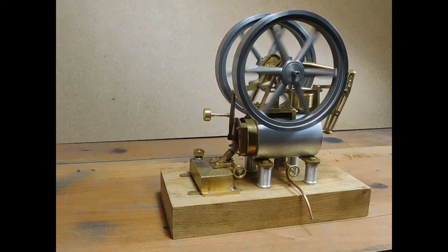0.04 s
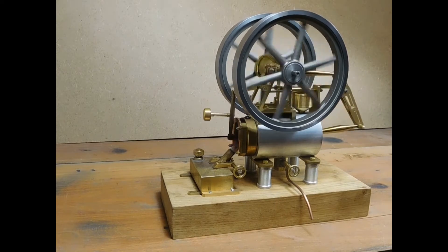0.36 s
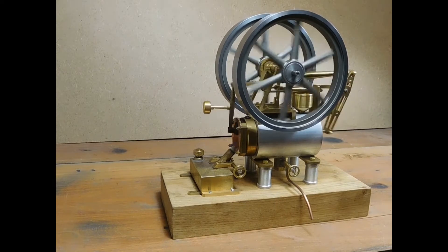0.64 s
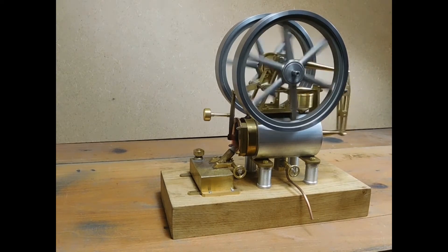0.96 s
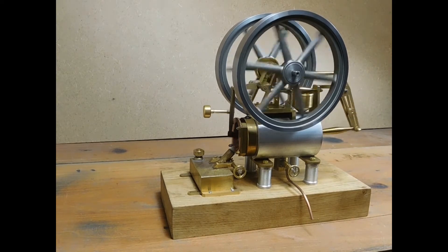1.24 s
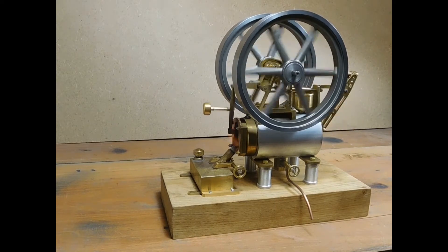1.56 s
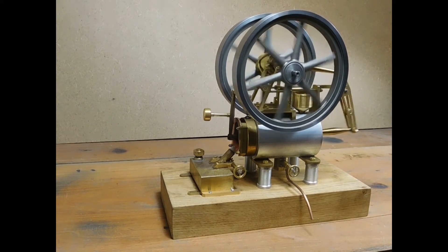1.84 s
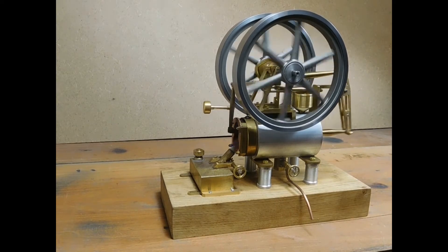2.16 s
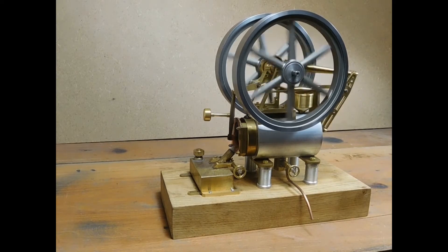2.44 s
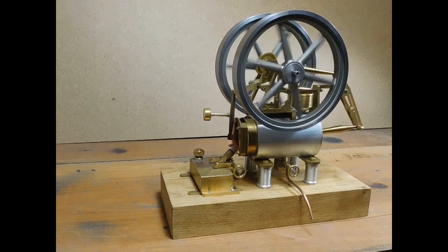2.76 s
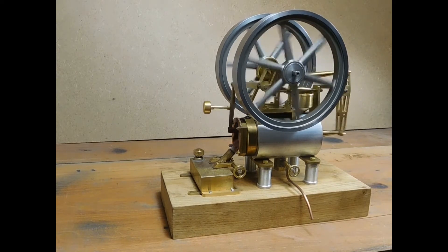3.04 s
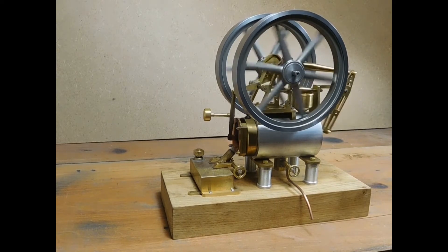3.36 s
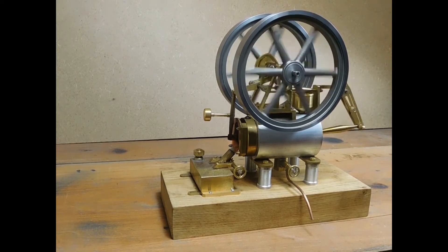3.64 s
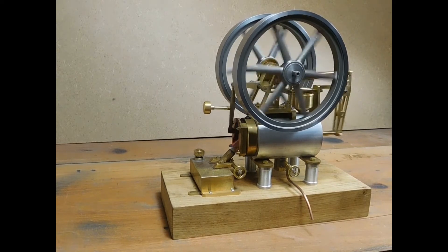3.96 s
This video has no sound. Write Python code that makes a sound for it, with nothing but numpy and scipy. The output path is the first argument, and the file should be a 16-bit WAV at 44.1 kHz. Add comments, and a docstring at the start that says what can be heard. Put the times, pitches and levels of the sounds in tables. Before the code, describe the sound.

A model engine turns over evenly in a small room with a short echo. About twice a second its valve snaps shut, gas hisses, the linkage knocks and a brass part clinks, while the bearings rattle softly over a light hiss.

```python
"""In a small room, on a wooden table, a model flame-licker engine turns over about twice a second.
Each cycle the valve clacks shut and thumps the base, gas hisses and chirps through the gap,
the linkage knocks twice and a brass part clinks. Bearings rub softly over a steady hiss.
The hits are made of short bursts of noise and fading tones; the room adds a short echo."""
import sys
import numpy as np
from scipy import signal
from scipy.fft import rfft, irfft
from scipy.io import wavfile
from scipy.ndimage import uniform_filter1d

SR = 44100
rng = np.random.default_rng(int(sys.argv[2]) if len(sys.argv) > 2 else 0)


def int16_out(signal):
    """Quantize to a 16-bit WAV file."""
    q = np.round(np.clip(np.atleast_2d(signal).T, -1, 1) * 32767)
    wavfile.write(sys.argv[1], SR, q.astype(np.int16))


N = 176400
T = np.arange(SR // 2) / SR  # time within one short sound [s]

# Levels in the tables are relative. A fade time (t60) is how long a sound takes to drop by 60 dB.
# each closing of the valve (time [s], level [dB], valve ring [dB], hollow ring [dB], gas rush [dB])
STROKES = [(.0075, 0, -1.5, -1, 0.5), (0.4898, -0.5, 1, -5, 3), (.9630, 0, -3, -11.5, 2),
           (1.4378, 1.5, 2.5, -0.5, 1.5), (1.9096, 1, 1, -2, 1.5), (2.3820, 1.5, 0.5, -3, 0.5),
           (2.8480, 2, 0, -2.5, 1), (3.3060, 1, -2.5, 3.5, 1.5), (3.765, 1.5, 1, 2.5, 0.5)]


def valve_clacks():
    """The valve slaps shut with a spit of gas, a softer echo follows 8 ms later, and the wooden base and table
    shake."""
    # ringing of the table, hollow base, valve plate and its first crack (pitch [Hz], level [dB], fade [s])
    table_modes = [(138, -9, 0.1), (180.4, -6.5, .12), (229.5, -11.5, 0.18), (280.5, -8, 0.099),
                   (391.6, -10.5, 0.083), (500, -6, 0.052)]
    hollow_modes = [(613, -8.5, 0.057), (662, 2, 0.07), (748, -4, 0.076), (805, -11.5, 0.095),
                    (882, -6, 0.06)]
    plate_modes = [(1467, 1.5, 0.026), (1580, -14.5, 0.03), (1640, -11.5, 0.097), (1673, -1, 0.044),
                   (1796, -4.5, 0.038)]
    crack_modes = [(1554, -12.5, 0.026), (780, -7.5, 0.015)]
    # tone colours of the dull thud and the bright spit (frequency [Hz], level [dB])
    thud_colour = [(30, -41), (90, -14), (150, -10.5), (300, -9), (480, -3), (750, 2.5), (1100, -8.5),
                   (1700, -4), (2000, -13), (4000, -15), (16000, -26)]
    spit_colour = [(100, -69), (3000, -10), (7500, -2), (9600, 4.5), (10300, 2), (11200, 5.5), (13000, 4.5),
                   (14300, -9), (16000, -6)]
    fresh = 0.96  # each hit is mostly new noise, plus a little that all hits share
    reused = np.sqrt(1 - fresh ** 2)
    shared_spit, shared_thud = noise(spit_colour), noise(thud_colour)
    out = np.zeros((2, N))
    for s, db, valve_db, hollow_db, _ in STROKES:
        table = ring(table_modes, scatter_db=0.04, detune=0.0013, spread=0.13)
        hollow = amp(hollow_db) * ring(hollow_modes, scatter_db=3, detune=0.0096, spread=0.11)
        add(out, s + 0.00253, amp(db - 42) * pan(-1.5) * (table + hollow))
        plate = ring(plate_modes, scatter_db=1.6, detune=0.009, spread=0.37)
        add(out, s + 0.00152, amp(db + valve_db - 39.5) * pan(-2.5) * plate)
        for lag, drop_db in ((0, 0), (0.008, -8)):  # the hit, then a softer echo of it 8 ms later
            spit = (reused * shared_spit + fresh * noise(spit_colour)) * envelope(0.0018, 0.00082, 0.013)
            thud = (reused * shared_thud + fresh * noise(thud_colour)) * envelope(0.0031, 0.0019, 0.041)
            add(out, s + lag, amp(db + drop_db - 40) * pan(0.5) * thud)
            add(out, s + lag + 0.003, amp(drop_db - 37.5) * pan(5.5) * spit)
        crack = ring(crack_modes, scatter_db=3.8, detune=0.014, spread=0.71)
        add(out, s + 0.00152, amp(db + valve_db - 36.5) * crack)
    return out


def gas_rush():
    """Gas hisses through the gap after each clack, with a flutter of faint chirps and a few loud ones."""
    # tone colour of the rushing gas (frequency [Hz], level [dB])
    gas_colour = [(60, -21), (200, -2), (600, 1.5), (1500, 4.5), (3500, 2.5), (6000, -2.5), (9000, 1.5),
                  (12000, -2.5), (14000, -8), (16000, -12)]
    # the louder chirps (time [s], level [dB], final pitch [Hz], fade [s])
    loud_chirps = [(.0590, -34.5, 11000, 0.016), (.094, -49, 7900, 0.046), (.5382, -37.5, 11500, 0.023),
                   (0.567, -49, 10500, .03), (0.569, -46, 7840, .03), (1.014, -41.5, 8080, .06),
                   (1.033, -50, 7600, .05), (1.471, -48, 12250, 0.045), (1.487, -54, 12700, 0.036),
                   (1.958, -50, 11300, 0.036), (1.973, -55, 10000, 0.037), (2.4288, -36, 11000, 0.024),
                   (2.4626, -45.5, 7700, 0.03), (2.882, -45, 12500, 0.037), (2.893, -51, 12800, .03),
                   (2.92, -46, 10000, 0.016), (3.326, -42, 10160, 0.082), (3.351, -41, 11300, 0.024),
                   (3.801, -47, 10000, 0.034), (3.837, -48, 9600, .03)]
    fall_hz_per_s = 30000
    swell = envelope(0.012, 0.047, 0.27) * amp(-70 * T)
    out = np.zeros((2, N))
    for s, *_, db in STROKES:
        rough_db = 2.5 * wobble(len(T), smooth_samples=70)
        add(out, s, amp(db - 46 + rough_db) * pan(-0.4) * noise(gas_colour) * swell)
        for lag in np.linspace(0.02, 0.072, 6):  # later chirps in the flutter tend to be lower
            stray_hz, stray_s, stray_db = rng.standard_normal(3) * (715, 0.0017, 2.5)
            hz = 11700 - fall_hz_per_s * (lag - 0.052) + stray_hz
            add(out, s + lag + stray_s, amp(-52 + stray_db) * chirp(hz, t60=0.03, sweep=0.047))
    for s, db, hz, t60 in loud_chirps:
        add(out, s, amp(db) * chirp(hz, t60, sweep=0.29))
    return out


def chirp(hz, t60, sweep):
    """A breathy whistle of gas starts too low by the fraction sweep, slides up to hz and fades."""
    glide_s, breath = 0.00155, 0.42
    pitch = hz * (1 - sweep * np.exp(-T / glide_s))
    ear_phase = np.array([[1.33], [0]])
    tone = unit(np.sin(2 * np.pi * np.cumsum(pitch) / SR + ear_phase))
    whistle = unit((1 - breath) * tone + breath * narrow_noise(pitch, width_hz=1500))
    return pan(9.5) * whistle * envelope(0.0011, 0.00069, t60)


def linkage_knocks():
    """The loose linkage gives dull knocks, and each one sets a steel rod ringing."""
    # knocks (time [s], level [dB], rod ring [dB])
    knocks = [(.115, -5, -11), (0.1228, -1.5, -3), (0.595, -4, -8), (0.6022, -7.5, 6.5), (1.068, -5, -12),
              (1.0765, -3.5, 0), (1.542, -4, -15), (1.5491, -4, 2), (2.013, -4, -12), (2.023, -5.5, 0.5),
              (2.485, -5, -4), (2.4917, -3.5, 0.5), (2.949, -3, -12), (2.9563, -1.5, 2.5), (3.409, 1, -3.5),
              (3.4168, -5, 4), (3.8645, -0.5, -12), (3.874, -1, -4), (3.903, -2.5, -4), (2.988, -7.5, -10),
              (3.445, -7, -8)]
    # tone colour of a knock (frequency [Hz], level [dB])
    knock_colour = [(60, -13), (300, -8), (600, 2), (1000, -11), (1500, 4), (2200, -4.5), (3300, -2),
                    (4800, -6.5), (7000, -8), (10500, -8.5), (16000, -21)]
    # ringing of the rod (pitch [Hz], level [dB], fade [s])
    rod_modes = [(2950, 1.5, 0.01), (3440, -3.5, 0.053), (4040, -2.5, 0.04), (4720, 0, 0.027),
                 (5820, 1, .02)]
    out = np.zeros((2, N))
    for s, db, rod_db in knocks:
        add(out, s, amp(db - 43) * noise(knock_colour) * envelope(0.00089, 0.0017, 0.042))
        rod = ring(rod_modes, scatter_db=2.5, detune=0.019, spread=0.78)
        add(out, s + 0.000922, amp(db + rod_db - 44) * rod)
    return out


def brass_clinks():
    """A brass part is struck once a cycle and rings brightly."""
    # clinks (time [s], level [dB])
    clinks = [(0.1617, -6), (0.6421, -3), (1.1166, -5.5), (1.5917, -1.5), (2.0627, -5.5), (2.534, -3),
              (2.9962, -1.5), (3.4568, -4), (3.9117, -1.5)]
    # tone colour of the strike (frequency [Hz], level [dB])
    strike_colour = [(60, -23), (300, -12), (620, 6), (850, -7.5), (1400, 1.5), (2000, -2.5), (2600, 7.5),
                     (4000, -9), (6500, -7.5), (8500, -4.5), (12000, -11), (16000, -14)]
    # ringing of the brass (pitch [Hz], level [dB], fade [s])
    brass_modes = [(2572, 6.5, 0.074), (2630, -10, .06), (3375, 1, 0.032), (3600, -5.5, 0.07),
                   (3900, -7.5, 0.1), (4120, -5.5, 0.085), (5380, -22, .9), (5360, 4, 0.028),
                   (7200, -36, .1), (8220, 3, 0.023), (9432, -7, 0.07)]
    out = np.zeros((2, N))
    for s, db in clinks:
        strike = amp(-39) * noise(strike_colour) * envelope(0.00071, 0.001, 0.086)
        brass = amp(-42.5) * ring(brass_modes, scatter_db=0, detune=0.0026, spread=0.79)
        add(out, s, amp(db) * (strike + brass))
    return out


def stray_ticks():
    """The loose rods give a few tiny ticks, each a burst of noise strongest at one pitch."""
    # ticks (time [s], level [dB], pitch [Hz], treble slope [dB/octave], fade [s], left over right [dB])
    ticks = [(0.4121, -42.5, 1510, -5, 0.038, 2), (2.6258, -37, 3000, -4, 0.011, 2),
             (3.0395, -48, 2740, -31, 0.016, -12), (3.4778, -39, 2270, -12.5, 0.011, -9)]
    out = np.zeros((2, N))
    for s, db, hz, slope_db, t60, pan_db in ticks:
        colour = [(hz / 32, -70), (hz, 0), (hz * 8, 3 * slope_db)]  # five octaves down, three up
        add(out, s, amp(db) * pan(pan_db) * noise(colour) * envelope(0.0003, 0.00029, t60))
    return out


def bearing_rattles():
    """The bearings rattle softly between the clacks."""
    # rattles (time [s], level [dB])
    rattles = [(0.3, -45), (0.329, -46), (0.37, -44.5), (0.791, -58), (0.86, -41.5), (0.889, -47),
               (1.329, -43), (1.359, -43.5), (1.383, -41), (1.723, -41.5), (1.75, -44.5), (1.789, -44),
               (2.26, -53), (2.301, -41.5), (2.748, -42.5), (3.125, -43.5), (3.639, -45.5), (3.684, -44.5)]
    # tone colour of a rattle (frequency [Hz], level [dB])
    rattle_colour = [(60, -62), (500, -1), (1300, 6.5), (2300, -0.5), (4000, 0), (6000, -9.5), (8000, 0.5),
                     (16000, -17)]
    out = np.zeros((2, N))
    for s, db in rattles:
        add(out, s, amp(db - 8.5) * noise(rattle_colour) * envelope(0.00068, 0.00067, 0.066))
    return out


def sliding_rubs():
    """Now and then a sliding part rubs briefly."""
    # rubs (time [s], level [dB], pitch [Hz])
    rubs = [(.306, -57.5, 1253), (1.352, -54, 1980), (1.379, -58.5, 1495)]
    out = np.zeros((2, N))
    for s, db, hz in rubs:
        add(out, s, amp(db) * narrow_noise(hz, width_hz=330) * envelope(0.008, 0.017, 0.058))
    return out


def room_echo(sound):
    """The room sends back scattered reflections; each range of pitch fades at its own speed."""
    # echo bands (frequency [Hz], fade [s], level [dB])
    bands = [(129, 1, -9), (392, 0.21, -2.5), (1200, 0.53, -5), (3500, 0.13, -5.5), (10000, 0.45, -16)]
    reflections = rng.standard_normal((2, len(T))) * (rng.random((2, len(T))) < 0.1) * (T > 0.005)
    hz = np.fft.rfftfreq(len(T), 1 / SR)
    alike = 1 / (1 + (hz / 450) ** 2)  # both ears get nearly the same bass
    spectrum = rfft(reflections)
    spectrum[1] = alike * spectrum[0] + np.sqrt(1 - alike ** 2) * spectrum[1]
    tail = np.zeros((2, len(T)))
    for centre_hz, t60, db in bands:
        band = curve([(row[0], row[0] == centre_hz) for row in bands], hz)
        fade = amp(-60 * T / t60)
        tail += amp(db) * irfft(spectrum * band, len(T)) * fade / np.linalg.norm(reflections[0] * fade)
    return signal.fftconvolve(sound, tail, axes=1)[:, :N]


def background_hiss():
    """The flame and the room hiss steadily, wavering a little, with two faint tones."""
    # tone colour of the hiss (frequency [Hz], level [dB])
    hiss_colour = [(15, -21), (25, -16), (71, -23), (140, -24.5), (169, -5.5), (233, -10), (433, -6),
                   (582, -2), (722, -2.5), (1270, -1.5), (2700, -5), (3630, -6), (4870, -10),
                   (11200, -15.5), (15500, -19.5)]
    # how alike it is in both ears (frequency [Hz], likeness [0 to 1])
    hiss_likeness = [(60, 0.53), (150, 0.94), (380, 0.17), (950, 0.21), (2380, 0.08), (5980, 0.06),
                     (15000, 0.01)]
    # which side it leans to (frequency [Hz], left over right [dB])
    lean = [(60, -5), (180, -1), (550, -1), (1650, -0.5), (4970, -0.5), (15000, 2.5)]
    # faint tones (pitch [Hz], width [Hz], level [dB])
    faint_tones = [(11450, 60, -76), (99.8, 20, -78.5)]
    lean_db = curve(lean, np.fft.rfftfreq(N, 1 / SR))
    ear_gains = amp(np.array([lean_db, -lean_db]) / 2)
    hiss = irfft(rfft(noise(hiss_colour, hiss_likeness, size=N)) * ear_gains, N)
    waver_db = 0.63 * wobble(N, smooth_samples=1500)
    tones = sum(amp(db) * narrow_noise(hz, width, size=N) for hz, width, db in faint_tones)
    return amp(-53.5 + waver_db) * hiss + tones


def ring(modes, scatter_db, detune, spread):
    """A struck part rings in fading tones (modes); level, pitch and left-right phase vary by hit."""
    out = np.zeros((2, len(T)))
    for k, (hz, db, t60) in enumerate(modes):
        stray_pitch, stray_db, ear_phase = rng.standard_normal(3) * (detune, scatter_db, spread)
        phase = 2 * np.pi * hz * (1 + stray_pitch) * T + ear_phase * np.array([[1], [-1]])
        out += (-1) ** k * amp(db - stray_db - 60 * T / t60) * np.sin(phase)
    return out * np.minimum(T / 0.00026, 1)


def noise(colour, likeness=None, size=len(T)):
    """Stereo noise with a given tone colour, partly alike in the two ears."""
    # how alike the short sounds are in both ears (frequency [Hz], likeness [0 to 1])
    usual_likeness = [(100, 1), (500, 1), (1500, 0.5), (4000, 0.55), (12000, 0.26)]
    hz = np.fft.rfftfreq(size, 1 / SR)
    alike = curve(usual_likeness if likeness is None else likeness, hz)
    mid, side = rfft(rng.standard_normal((2, size))) * np.sqrt([1 + alike, 1 - alike])
    return unit(irfft(np.array([mid + side, mid - side]) * amp(curve(colour, hz)), size))


def narrow_noise(hz, width_hz, size=len(T)):
    """Stereo noise gathered around one pitch, which may slide."""
    offset_hz = np.fft.fftfreq(size, 1 / SR)
    real, imag = rng.standard_normal((2, 3, size))
    drift = np.fft.ifft((real + 1j * imag) / (1 + (offset_hz / width_hz) ** 2))  # left, right, shared
    tone = np.exp(2j * np.pi * np.cumsum(hz * np.ones(size)) / SR)
    return unit(((drift[:2] + drift[2]) * tone).real)


def wobble(size, smooth_samples):
    """A smoothed random wiggle."""
    return unit(uniform_filter1d(rng.standard_normal(size), size=smooth_samples))


def envelope(rise_s, hold_s, t60):
    """Loudness that rises, holds and fades away."""
    return np.minimum(T / rise_s, 1) * amp(-60 * np.maximum(T - rise_s - hold_s, 0) / t60)


def amp(db):
    """Turns decibels into a gain."""
    return 10 ** (np.asarray(db) / 20)


def unit(x):
    """Scales a signal to an average strength (rms) of 1."""
    return x / np.sqrt(np.mean(x ** 2) + 1e-20)


def curve(points, hz):
    """Joins (frequency, value) points on an octave scale and gives the value at hz."""
    point_hz, value = np.transpose(points)
    return np.interp(np.log(hz + 1), np.log(point_hz + 1), value)


def pan(db):
    """Gains that make the left ear db louder than the right."""
    return amp(np.array([[db], [-db]]) / 2)


def add(mix, s, sound):
    """Mixes a sound in at s seconds."""
    part = mix[:, max(0, round(s * SR)):][:, :sound.shape[-1]]
    part += sound[..., :part.shape[1]]


def scene():
    """The engine, its echo and the hiss; three echoes fade in and out so the reflections slowly change."""
    engine = valve_clacks() + gas_rush() + linkage_knocks() + brass_clinks()
    engine += stray_ticks() + bearing_rattles() + sliding_rubs()
    angle = 2 * np.pi * np.arange(N) / N
    echo = sum(room_echo(engine * np.cos(angle + k * np.pi / 3) * np.sqrt(2 / 3)) for k in range(3))
    return engine + echo + background_hiss()


def record(dry):
    """Trims away the deepest rumble and the highest treble."""
    low_cut = signal.butter(1, 36, "high", fs=SR, output="sos")
    high_cut = signal.firwin(511, 15800, window=("kaiser", 9), fs=SR)
    return signal.oaconvolve(signal.sosfilt(low_cut, dry), high_cut[None], "same")


dry = scene()
out = record(dry)
int16_out(out)
```